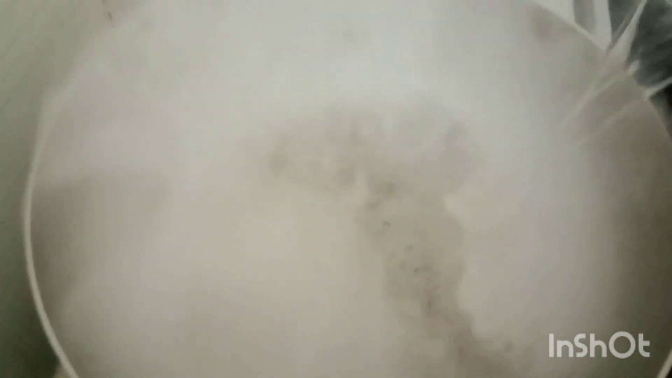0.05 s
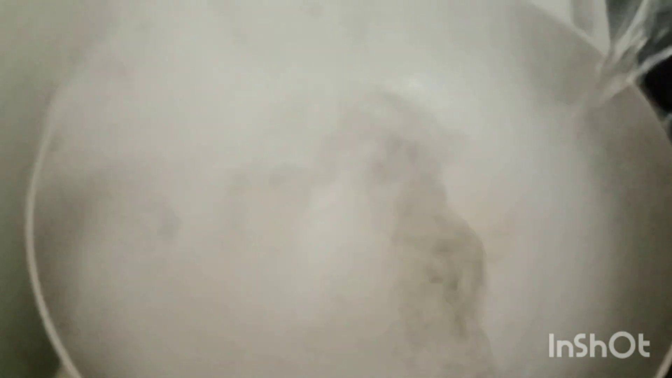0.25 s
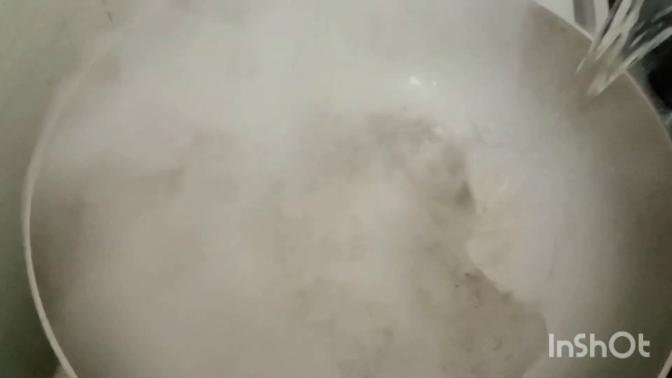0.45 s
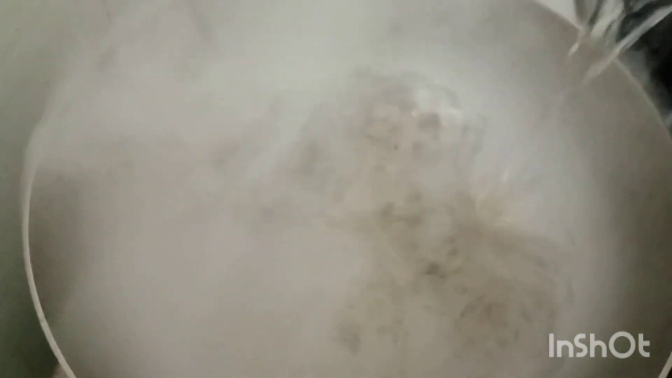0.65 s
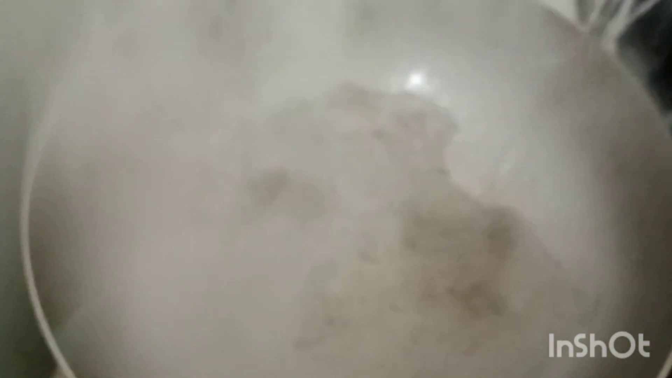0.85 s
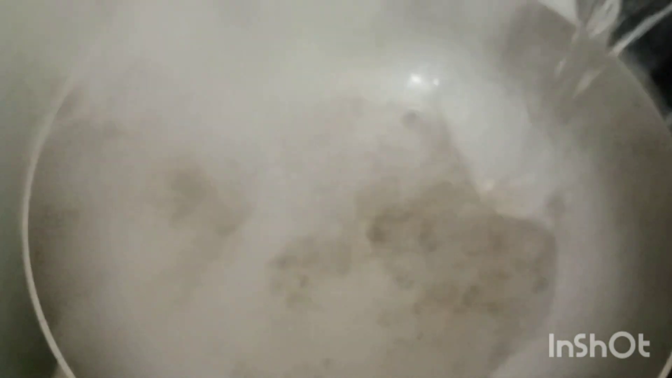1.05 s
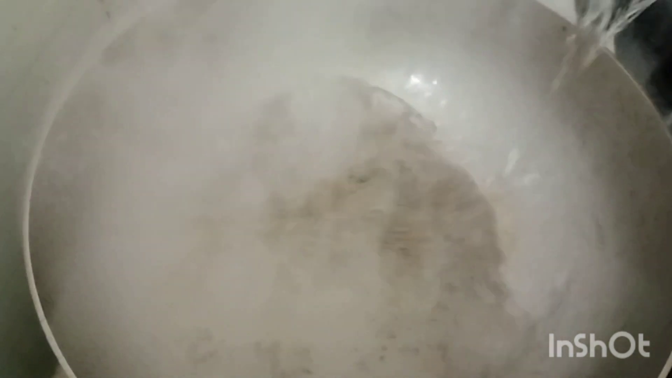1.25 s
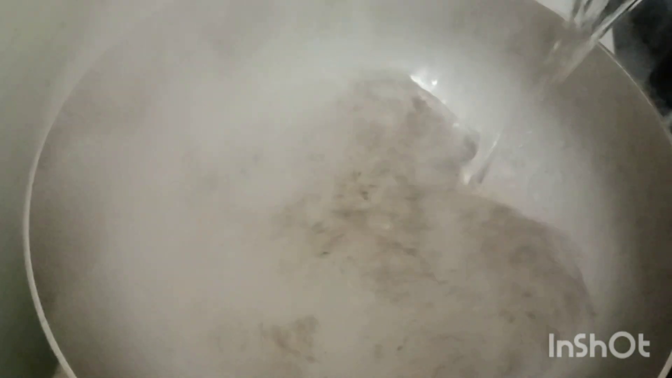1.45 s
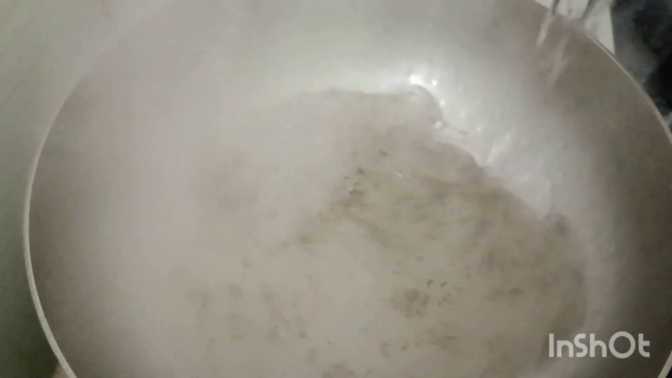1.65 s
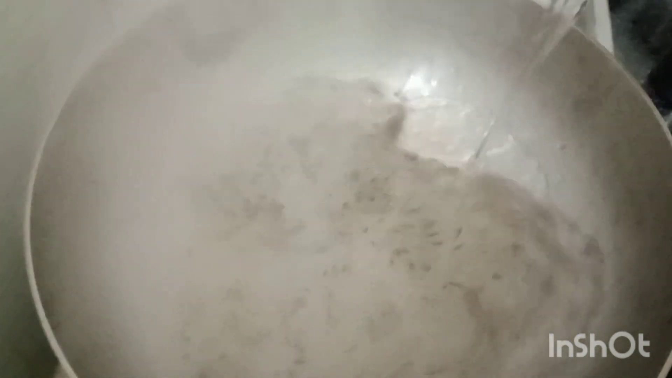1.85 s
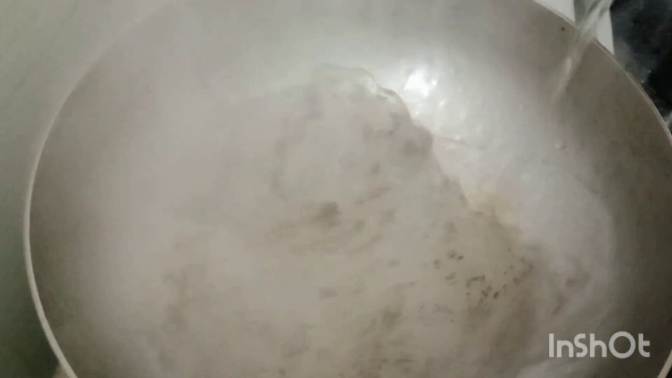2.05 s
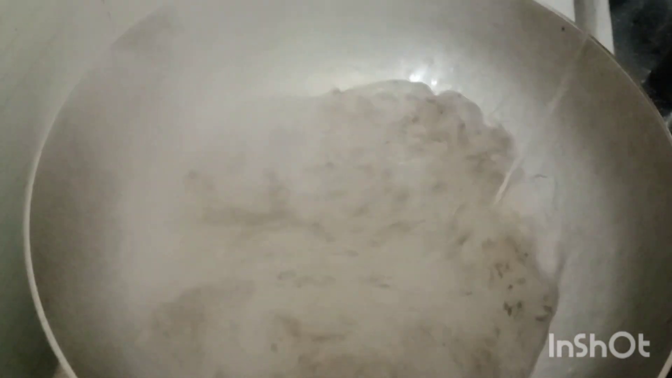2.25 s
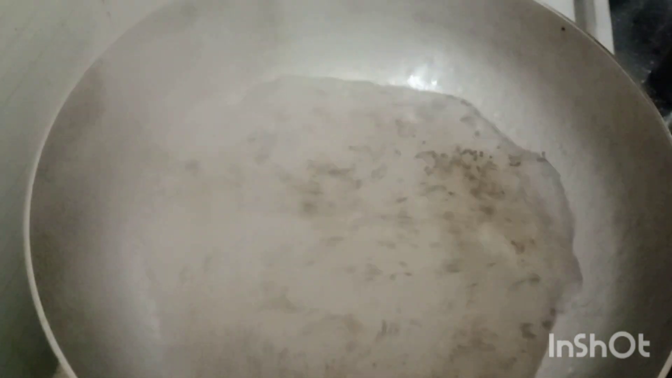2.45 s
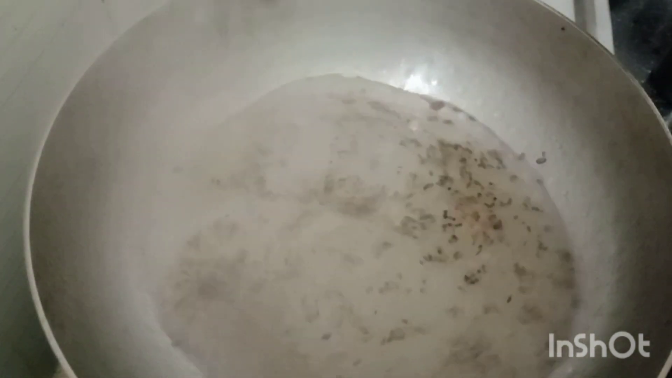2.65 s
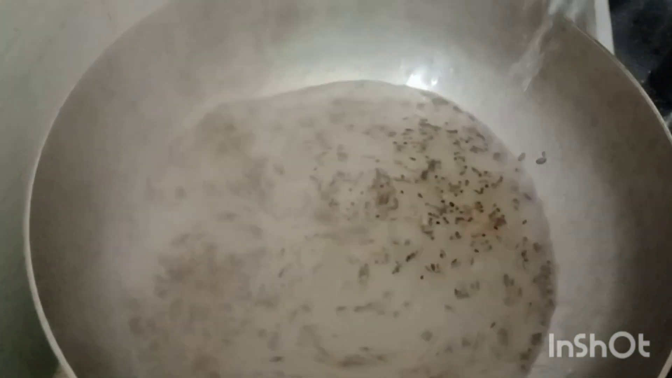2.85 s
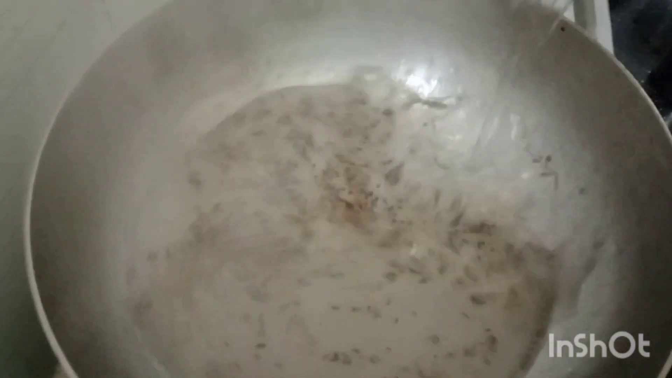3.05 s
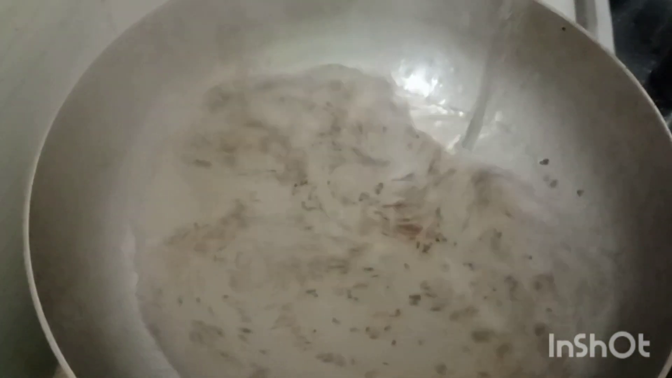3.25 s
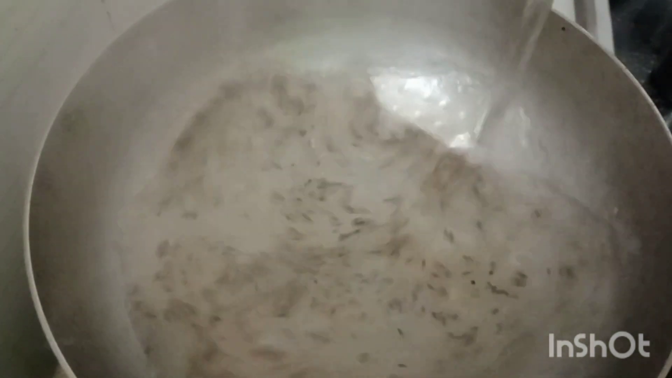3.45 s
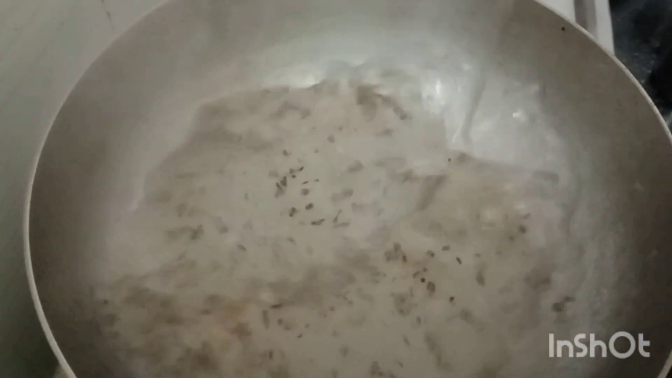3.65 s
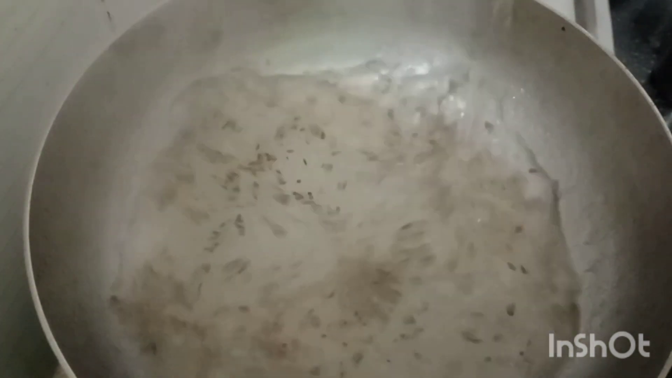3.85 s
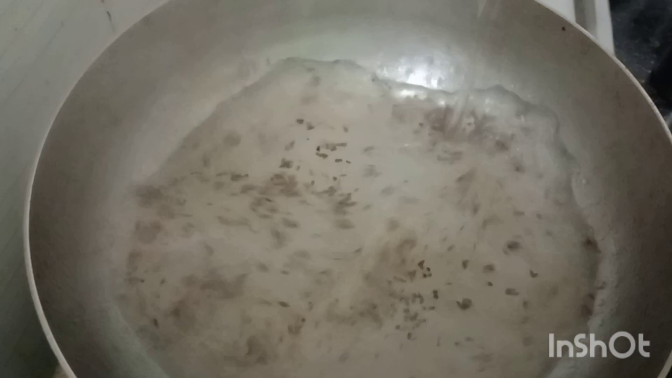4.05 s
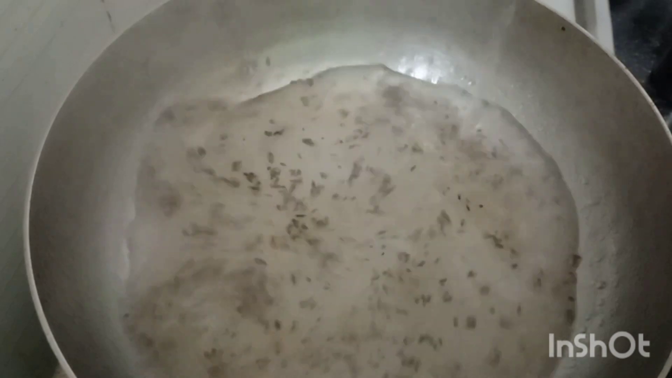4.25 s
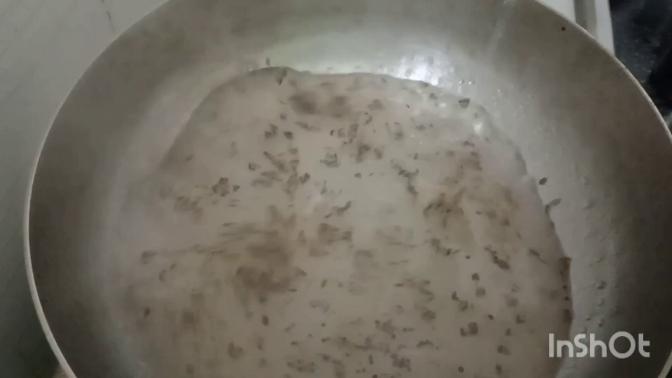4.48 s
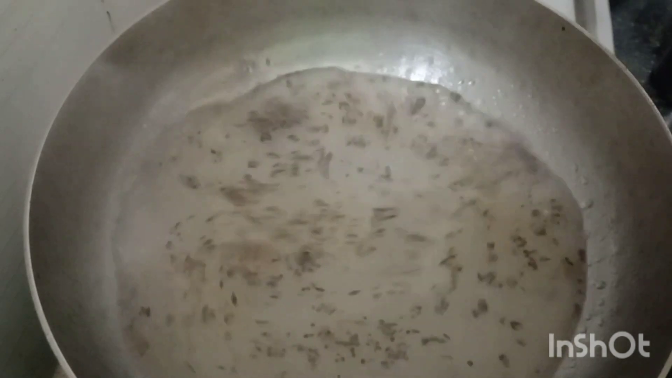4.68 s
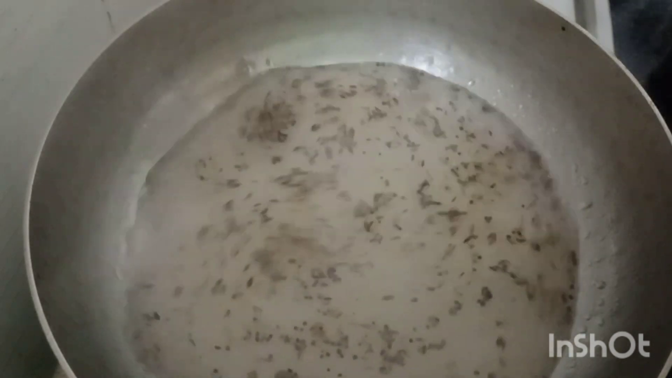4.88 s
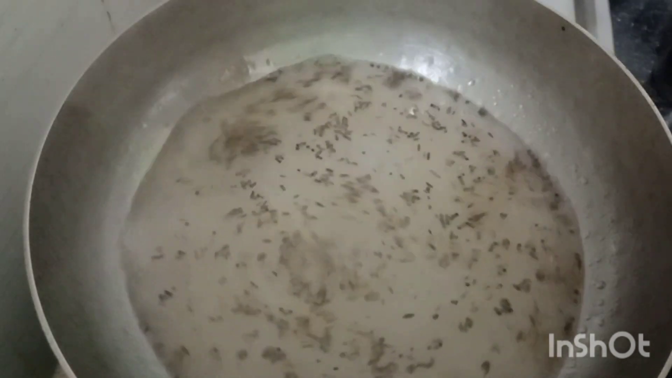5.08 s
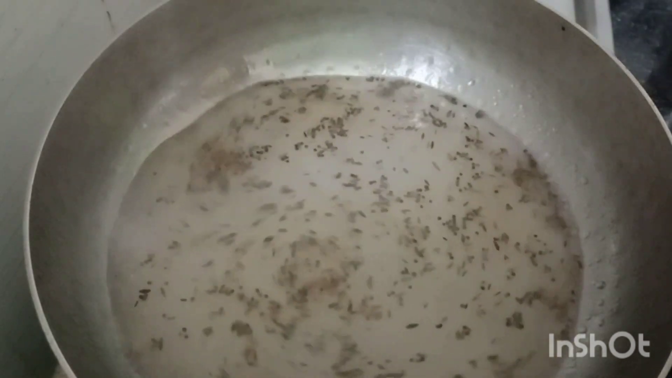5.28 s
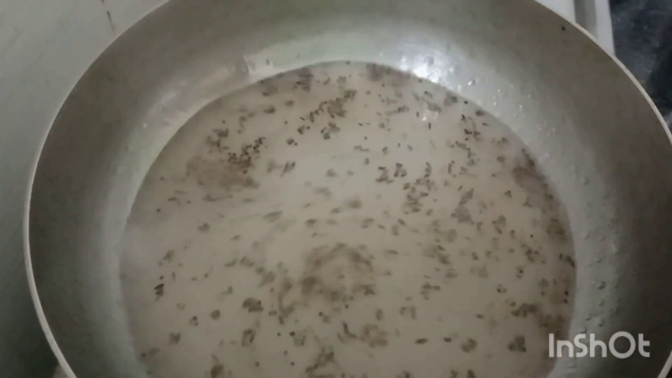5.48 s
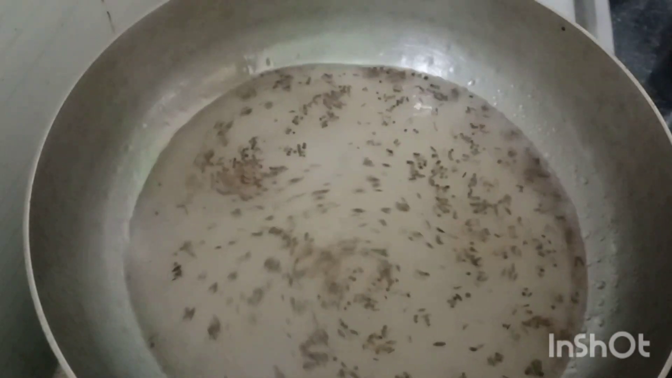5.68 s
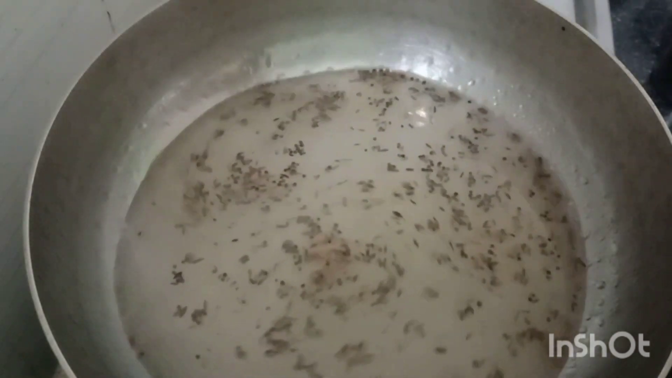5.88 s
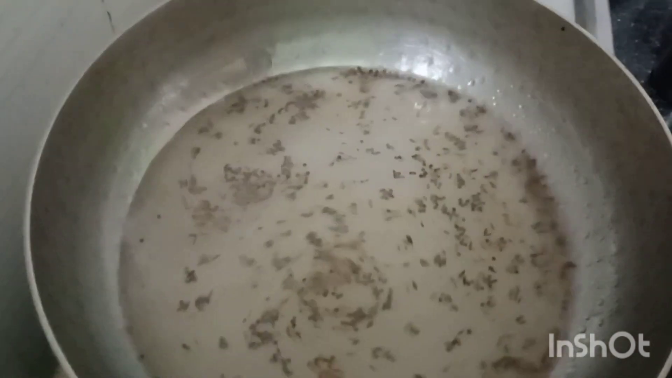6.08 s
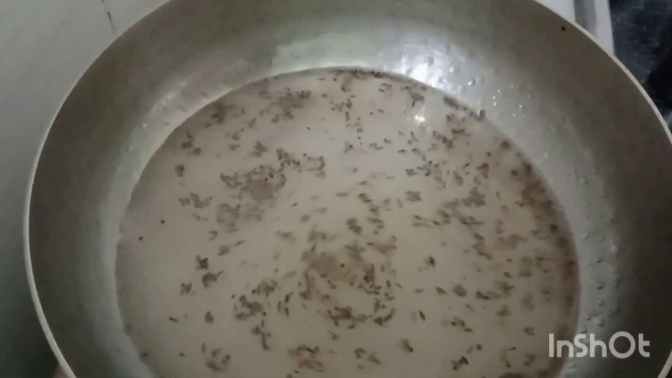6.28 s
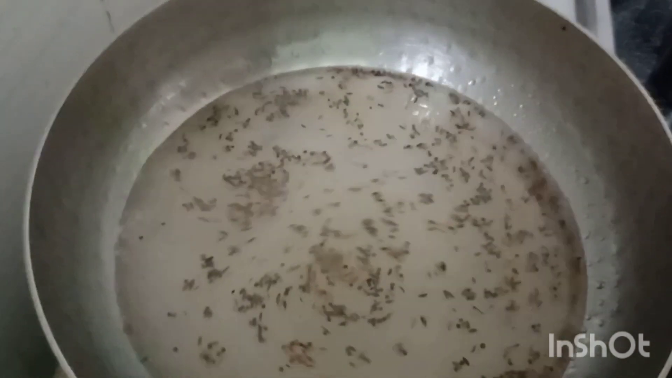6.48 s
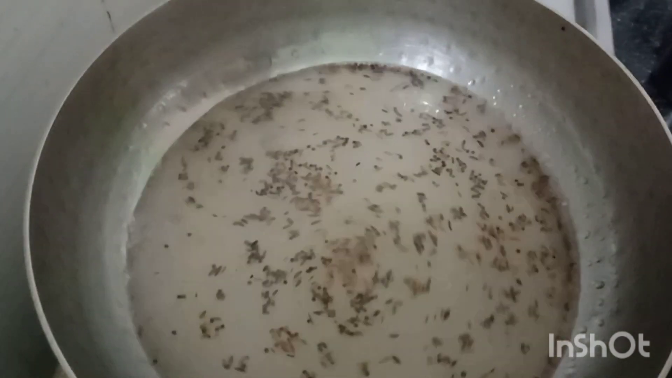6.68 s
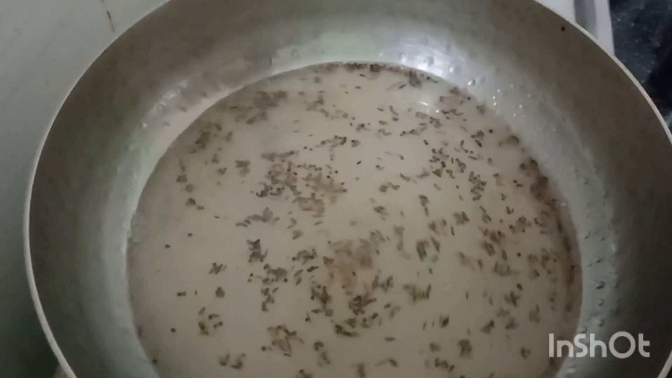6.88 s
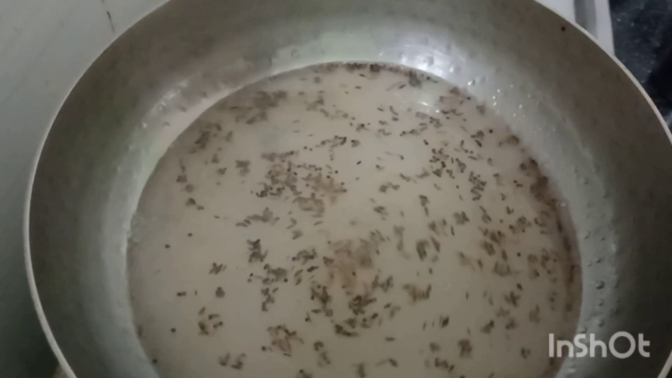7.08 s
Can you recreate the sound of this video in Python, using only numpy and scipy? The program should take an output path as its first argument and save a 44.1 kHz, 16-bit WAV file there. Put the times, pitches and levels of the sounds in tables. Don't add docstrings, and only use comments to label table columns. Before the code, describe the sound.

Water hits a hot metal pan of oil and spices, a violent hissing sizzle with thumping pops, thinning into scattered crackles and a small hollow knock.

```python
import sys
import numpy as np
from scipy import signal
from scipy.io import wavfile

SR = 44100
rng = np.random.default_rng(int(sys.argv[2]) if len(sys.argv) > 2 else 0)


def wav_record(signal):
    frames = np.transpose(np.atleast_2d(signal))
    bounded = np.clip(frames, -1, 1)
    quanta = np.round(bounded * 32767).astype(np.int16)
    wavfile.write(sys.argv[1], SR, quanta)


def undo_db(level):
    steps = np.asarray(level, float) / 20
    return 10 ** steps


N = 314427

# t/s, level/dB
FIZZ_LEVEL = [(0.0, -24), (0.65, -24.5), (1.29, -23.5), (1.45, -26), (1.89, -25), (2.28, -28), (2.52, -30),
              (3.22, -25.5), (3.39, -24), (3.89, -26.5), (3.99, -28), (5.2, -31.5), (5.42, -36),
              (6.19, -36), (6.37, -41.5), (6.67, -37.5), (6.79, -38.5), (7.13, -32.5)]
# f/Hz, level/dB
BOWL_COLOUR = [(200, -63), (1050, -31.5), (1600, -18), (2600, -15), (4000, -12), (6100, -5.5), (6650, -9),
               (7200, -2), (7800, -5.5), (9000, -13.5), (12500, -22), (16000, -19)]
# f/Hz, level/dB
PORT_LIFT = [(100, 0), (13900, 0), (14650, 12), (15500, 14.5)]
# f/Hz, width/Hz, level/dB
PAN_RING = [(1245, 60, 0), (1330, 110, -9)]
# f/Hz, width/Hz, level/dB
RIM_RINGS = [(1950, 48, -4), (2630, 98, -10), (3140, 160, -8.5), (3680, 115, -6), (910, 67, -12)]
# t/s, ring from the fizz level/dB, low body of the pops level/dB
FILLING = [(0, -4.5, -1), (1.5, -2, -4.5), (2.5, -6, -3), (3.5, -4.5, -1), (4.4, -3.5, -7),
           (4.6, -8.5, -21.5), (5.5, -5.5, -28), (6.3, -9, -35), (7.13, -7, -37)]
# f/Hz, level/dB
DULL_COLOUR = [(300, -49.5), (1050, -10.5), (1700, -7), (3800, -7.5), (6000, -15.5), (12000, -57.5)]
# f/Hz, level/dB
BODY_COLOUR = [(100, -40), (400, 1), (800, 5), (1400, 1), (2500, -6.5), (8000, -30.5)]


def sizzle(slips):
    small = undo_db(curve(FIZZ_LEVEL, 1) + 10) * fizz()
    snaps, pulses = pops()
    small_tail = bowl(small)
    large_tail = bowl(snaps + undo_db(-19) * pulses, t60=0.018)
    air = small + undo_db(-7) * small_tail + snaps + undo_db(-4.5) * large_tail
    air = coloured(coloured(air, BOWL_COLOUR), PORT_LIFT)

    ring_db, body_db = curve(FILLING, 1), curve(FILLING, 2)
    dull = coloured(pulses, DULL_COLOUR) + coloured(pulses * undo_db(body_db), BODY_COLOUR)
    small_slips = slips * (slips ** 2 < 0.02)
    dull += coloured(undo_db(-5) * small_slips, DULL_COLOUR)

    blows = undo_db(ring_db) * small_tail + undo_db(6.5 + 0.32 * body_db) * pulses
    blows += undo_db(26.5) * slips * rng.random(N)
    ringing = signal.lfilter(*signal.butter(2, 900, "high", fs=SR), ring(blows, PAN_RING))
    return air + dull + ringing + undo_db(-6) * ring(small_tail, RIM_RINGS)


def fizz(per_s=2000, spread_db=6.5, clump=0.44, hiss=0.63, count=24):
    rate = per_s * np.exp(clump * wander(35) + 0.3 * wander(4.2))
    size = undo_db(spread_db * np.minimum(rng.exponential(1, N), 3.4))
    hits = size * (rng.random(N) < rate / SR)
    kind = rng.integers(0, count, N)
    hits *= rng.choice([-1., 1.], N)
    out = np.zeros(N)
    for k, hz in enumerate(np.geomspace(2500, 18000, count)):
        grain = burst(hz, rng.standard_normal(300))
        out += signal.oaconvolve(hits * (kind == k), grain)[:N]
    return evened(evened(out) + hiss * rng.standard_normal(N))


# t/s, bright snap level/dB, dull pressure pulse level/dB
BOIL_BURSTS = [(0.009, -23, 3.5), (0.1453, -1, -1), (0.3042, 2, 3.5), (0.54, 2, -2.5), (0.6082, 1, 0.5),
               (0.7029, -1, 1.5), (0.7403, 4, -1.5), (0.7786, -4, 2.5), (0.809, -2, 5), (0.987, -7, 5),
               (0.9972, -14, 3.5), (1.0177, 7, 2), (1.0972, 1, 2.5), (1.2668, 0, 3.5), (1.4387, 1, 1),
               (1.459, -11, 4.5), (1.5017, 0, 0), (1.5208, -11, -6.5), (1.5978, 2, -2), (1.7494, 2, -2),
               (1.934, 6, 0), (2.046, -5, -6), (2.0814, -2, 0), (2.194, -12, -5)]
# t/s, snap level/dB, pulse level/dB
POUR_BURSTS = [(2.314, 3, 1), (2.345, 4, -5.5), (2.4286, 7.5, 2.5), (2.4726, -7, 1.5), (2.503, 0, -19),
               (2.5634, 1, -3), (2.38, -14, -1), (2.74, 6.5, -16), (2.782, 0, -2), (2.8125, 3, -1.5),
               (2.868, 4, -4.5), (2.9486, 6, -28), (2.998, -1, -5), (3.2037, 2.5, -5), (3.5156, -7, -1.5),
               (3.7374, 1, -13), (3.7502, -16, 2), (3.9074, 2, -19), (3.9674, 4, -21), (3.9996, 8.5, -13),
               (4.092, -11, -2.5), (4.1984, 2, -10), (4.2395, 6.5, -11), (4.3066, 10, -24),
               (4.3435, 4, 10.5), (4.3735, 3, -6.5), (4.3993, -7, -7), (4.437, 5, -18), (4.448, 1, -12),
               (4.535, 4.5, -8)]
# t/s, snap level/dB, pulse level/dB
SETTLE_BURSTS = [(4.578, -1, -26), (4.631, -4, -4), (4.6484, 1, -25), (4.7508, -2, -2.5), (4.8015, -4, -16),
                 (4.8955, 6.5, -2.5), (4.9485, -1, -8), (5.0038, -3, -29), (5.0354, 2.5, -4.5),
                 (5.0714, 0, -20), (5.1392, 5, -1.5), (5.1495, 1, -17), (5.232, -2, -31), (5.286, -1, -14),
                 (5.3057, 0, -12), (5.3367, 1, -18), (5.4603, -1, -8.5), (5.4738, 0, -20), (5.525, 5, -27),
                 (5.5786, -3, -14), (5.615, -7, -8), (5.6529, -6, -7.5), (5.6636, 1.5, -10), (5.73, -4, -6),
                 (5.7826, -6, -8), (5.8203, 3, 0.5), (5.8523, -19, -8), (5.8716, -5, -21),
                 (5.918, -10, -6.5)]
# t/s, snap level/dB, pulse level/dB
LAST_BURSTS = [(6.0004, 0, -12), (6.0338, 0, -24), (6.0592, -2.5, -28), (6.1322, -5, -20), (6.17, -9, -12),
               (6.188, 2, -19), (6.275, -6, -5.5), (6.3426, -3.5, -12), (6.3642, -24, -8.5),
               (6.389, 0, -15), (6.4307, -3.5, -21), (6.496, -6, -30), (6.5626, 4, -10), (6.592, 1, -10),
               (6.6445, 2.5, -10), (6.671, -2, -22), (6.708, -1, -10), (6.753, 1, -12), (6.8017, -5.5, -22),
               (6.861, -5, -20), (6.9671, 0.5, -15), (7.1239, -7, -9), (6.3314, -6, -21), (6.734, -6, -21)]
# t/s, rate/(1/s), snap level/dB, pulse level/dB
LESSER_BURSTS = [(0, 18, -9, -0.5), (2.2, 16, -6, -2.5), (2.6, 8, -6.5, -17), (4.5, 9, -2, -12),
                 (5.5, 8, -1.5, -24), (7.13, 8, -14, -19)]


def pops(snap_db=9, pulse_db=9, spread_db=3.5):
    at = np.flatnonzero(rng.random(N) < curve(LESSER_BURSTS, 1) / SR)
    levels = np.column_stack([curve(LESSER_BURSTS, 2)[at], curve(LESSER_BURSTS, 3)[at]])
    levels += spread_db * np.minimum(rng.standard_normal((400, 2)), 1.3)[:len(at)]
    lesser = np.column_stack([at / SR, levels])
    rows = BOIL_BURSTS + POUR_BURSTS + SETTLE_BURSTS + LAST_BURSTS + list(lesser)

    snaps, pulses = np.zeros((2, N + 300))
    cracks = rng.standard_normal((500, 300))
    for (s, snap, pulse), crack in zip(rows, cracks):
        bright = burst(5500, crack, cycles=0.58, spray_s=0.00032, spray=0.93)
        dull = burst(2700, crack[::-1], cycles=0.15, spray_s=0.00027, spray=0.46)
        start = round(s * SR)
        snaps[start:start + 300] += undo_db(snap + snap_db) * bright
        pulses[start:start + 300] += undo_db(pulse + pulse_db) * dull * np.sign(crack[0])
    snaps = signal.lfilter(*signal.butter(2, 4200, "high", fs=SR), snaps)
    return snaps[:N], pulses[:N]


def burst(hz, crack, cycles=0.64, spray_s=0.0002, spray=0.99):
    t = np.arange(len(crack)) / SR
    snap = np.cos(2 * np.pi * hz * t) * np.exp(-t * hz / cycles)
    sound = snap + spray * crack * np.exp(-t / spray_s)
    return sound / np.linalg.norm(sound)


def bowl(x, t60=0.0064):
    keep = np.exp(-2 * np.log(1000) / (t60 * SR))
    power = signal.lfilter([1 - keep], [1, -keep], x ** 2)
    return np.sqrt(abs(power)) * rng.standard_normal(N)


# t/s, rate/(1/s), typical size level/dB
SMALL_SLIPS = [(0, 201, -11.5), (1, 226, -13), (1.9, 153, -16.5), (2.2, 90, -17), (2.24, 0, -28)]
# t/s, signed step size
BOIL_SLIPS = [(0.053, -0.6), (0.1426, 0.44), (0.2387, 0.35), (0.2998, -0.49), (0.5134, -0.48),
              (0.6572, -0.49), (0.7053, 0.44), (0.7388, 0.49), (0.8018, 0.38), (0.8652, -0.46),
              (0.8997, -0.38), (0.9588, 0.38), (1.0107, -0.39), (1.0532, -0.32), (1.126, 0.56),
              (1.1502, -0.46), (1.1602, -0.5), (1.3334, -0.39), (1.3904, 0.38), (1.4589, -0.37),
              (1.615, 0.37), (1.6516, -0.44), (1.7586, 0.46), (1.8176, -0.35), (1.8271, -0.39),
              (1.9722, 0.38), (2.0459, -0.44), (2.0872, -0.38), (2.1853, 0.37), (2.1942, -0.31)]
# t/s, signed step size
POUR_SLIPS = [(2.2799, 0.26), (2.3139, -0.13), (2.3212, 0.16), (2.3444, -0.08), (2.3796, 0.06),
              (2.3917, -0.17), (2.4282, 0.18), (2.4293, -0.14), (2.4727, -0.35), (2.5028, 0.18),
              (2.582, 0.36), (2.5879, -0.39), (2.6159, 0.31), (2.638, -0.16), (2.7819, -0.33),
              (2.8137, -0.17), (2.8245, 0.09), (2.9881, 0.1), (2.9981, -0.11), (3.0617, 0.16),
              (3.204, 0.16), (3.2093, -0.29), (3.2165, 0.13), (3.2395, -0.09), (3.3688, -0.04),
              (3.4374, -0.11), (3.4563, 0.17), (3.5143, -0.17), (3.5154, 0.17), (3.5224, -0.19)]
# t/s, signed step size
LAST_SLIPS = [(3.5888, 0.22), (3.605, 0.17), (3.6574, -0.24), (3.7506, -0.1), (3.7969, -0.12), (3.813, 0.3),
              (3.8207, 0.21), (3.8608, -0.12), (3.8728, -0.23), (4.0464, -0.26), (4.1314, 0.38),
              (4.1506, -0.18), (4.2277, -0.32), (4.2396, 0.26), (4.3075, -0.2), (4.3444, 0.22),
              (4.3456, -0.31), (4.4001, 0.09), (4.5773, 0.14), (4.9751, -0.11), (5.6882, 0.09),
              (5.8765, 0.05), (6.8015, 0.14)]


def slipping(middling_per_s=42, middling_size=0.25, middling_spread=0.04):
    boiling = np.arange(N) < SMALL_SLIPS[-1][0] * SR
    small = (rng.random(N) < curve(SMALL_SLIPS, 1) / SR) * boiling
    small = small * undo_db(curve(SMALL_SLIPS, 2)) * rng.standard_normal(N)
    middling = middling_size + middling_spread * rng.standard_normal(N)
    middling *= rng.choice([-1., 1.], N)
    middling *= (rng.random(N) < middling_per_s / SR) * boiling
    slips = np.clip(small, -0.14, 0.14) + middling
    s, size = np.transpose(BOIL_SLIPS + POUR_SLIPS + LAST_SLIPS)
    np.add.at(slips, np.round(s * SR).astype(int), size)
    return slips


def jolts(slips, soft_hz=4000):
    return signal.lfilter(*signal.butter(1, soft_hz, fs=SR), np.cumsum(slips))


# f/Hz, width/Hz, level/dB
JUG_RINGS = [(608, 26, 0), (1077, 34, -2), (640, 140, -13), (1200, 350, -19), (1879, 45, -15),
             (3090, 60, -15), (4522, 70, -13), (3500, 2500, -30), (6300, 1200, -22)]
# t/s, contact force level/dB, fading/(dB/s)
JUG_CONTACTS = [
    (6.18, -11.5, 1800),
    (6.199, -18, 500),
    (6.214, -30.5, 1200),
    (6.236, -28, 900),
    (6.3, -40, 500),
    (6.465, -65, 300),
]


def jug(clicks_per_s=900, rise_s=0.0023, hum_db=-39, hum_fade_db_per_s=95, hum_width_hz=18):
    now = np.arange(N) / SR
    clicks = (rng.random(N) < clicks_per_s / SR) * rng.standard_normal(N)
    clicks += 0.13 * rng.standard_normal(N)
    force = np.zeros(N)
    for s, db, fade in JUG_CONTACTS:
        rise = np.clip((now - s) / rise_s, 0, 1)
        force += rise * undo_db(db - fade * np.maximum(now - s, 0))
    rung = ring(clicks * force, JUG_RINGS) / ring(clicks, JUG_RINGS).std()

    since = now - JUG_CONTACTS[0][0]
    hum = evened(ring(rng.standard_normal(N), [(JUG_RINGS[0][0], hum_width_hz, 0)]))
    hum *= (since > 0) * undo_db(hum_db - hum_fade_db_per_s * abs(since))
    no_bass = signal.lfilter(*signal.butter(3, 380, "high", fs=SR), rung + hum)
    return no_bass + undo_db(-11.5) * rung


def evened(x):
    return x / np.sqrt(np.mean(x ** 2) + 1e-20)


def curve(rows, column):
    rows = np.array(rows)
    return np.interp(np.arange(N) / SR, rows[:, 0], rows[:, column])


def coloured(x, points):
    hz, db = np.transpose(points)
    bins_hz = abs(np.fft.fftfreq(8192, 1 / SR))
    log_gain = np.interp(np.log(bins_hz + 1), np.log(hz), db) * np.log(10) / 20
    taps = np.fft.ifft(np.exp(np.conj(signal.hilbert(log_gain)))).real[:4096]
    return signal.oaconvolve(x, taps)[:N]


def ring(x, modes):
    t = np.arange(8000) / SR
    taps = np.zeros(len(t))
    for hz, width, db in modes:
        decay = 2 * np.pi * width / SR * np.exp(-np.pi * width * t)
        taps += undo_db(db) * decay * np.sin(2 * np.pi * hz * t)
    return signal.oaconvolve(x, taps)[:N]


def wander(per_s):
    noise = rng.standard_normal(N + 2 * SR)
    slow = signal.sosfilt(signal.butter(3, per_s, fs=SR, output="sos"), noise)
    return evened(slow[2 * SR:])


def scene():
    slips = slipping()
    return (sizzle(slips) + jolts(slips) + jug())[None]


# f/Hz, level/dB
MIC_NOISE = [(20, 25), (110, 19), (190, -25), (400, -53), (900, 9), (8000, -6)]


def microphone(dry, bass_cut_hz=114, ceiling=1.15):
    cut = signal.sosfilt(signal.butter(3, bass_cut_hz, "high", fs=SR, output="sos"), dry)
    cut = signal.lfilter(*signal.butter(1, 30, "high", fs=SR), cut)
    noise = undo_db(-75) * evened(coloured(rng.standard_normal(N), MIC_NOISE))
    return np.tanh(cut / ceiling) * ceiling + noise


def top_cut(x):
    return signal.sosfilt(signal.butter(12, 16820, fs=SR, output="sos"), x)


def record(dry, edge_hz=15490, leak_hz=15850):
    heard = microphone(dry)
    edge = signal.firwin(1201, edge_hz, window=("kaiser", 9), fs=SR)
    wider = signal.firwin(301, leak_hz, window=("kaiser", 9), fs=SR)
    edged = signal.oaconvolve(heard, edge[None], "same")
    leak = signal.oaconvolve(heard, wider[None], "same") - edged
    return top_cut(edged + undo_db(-26) * leak)


dry = scene()
out = record(dry)
wav_record(out)
```